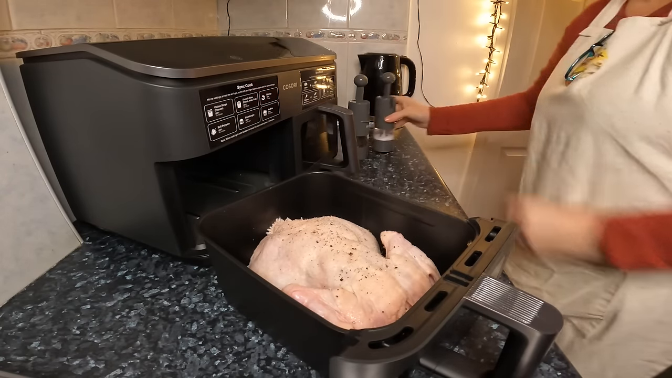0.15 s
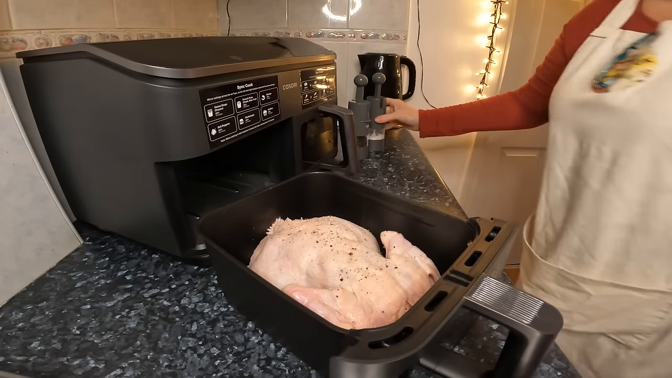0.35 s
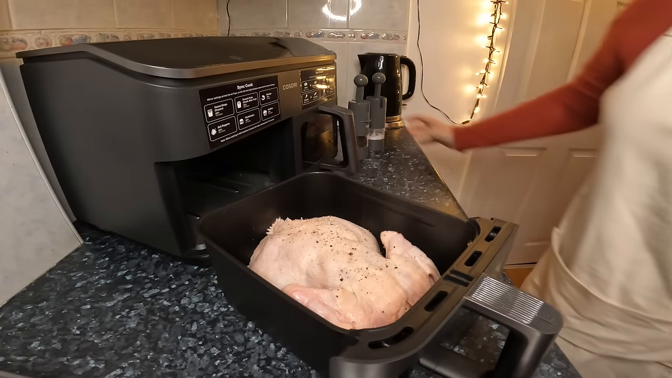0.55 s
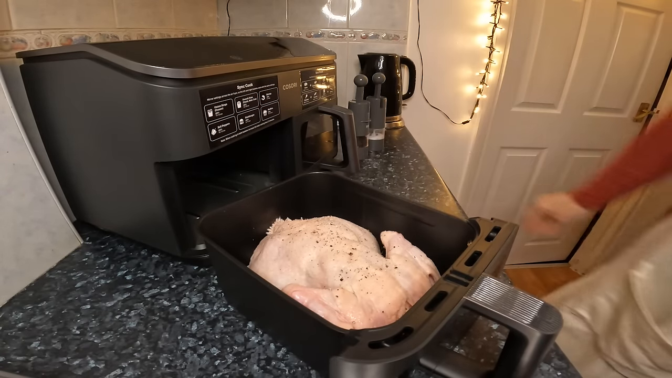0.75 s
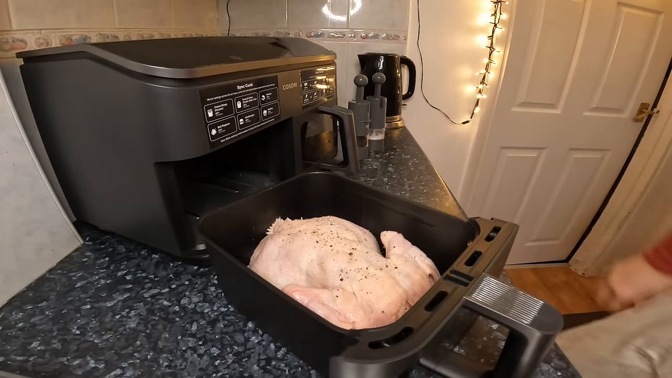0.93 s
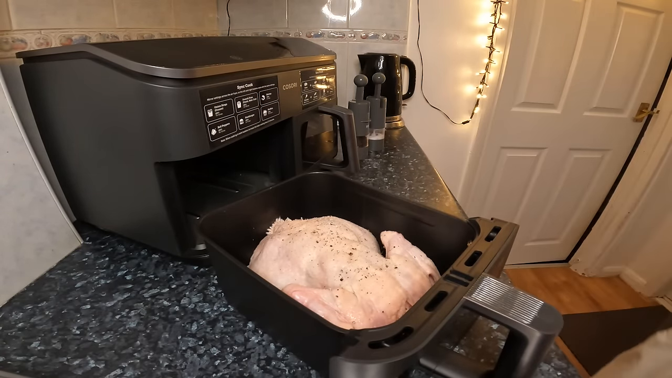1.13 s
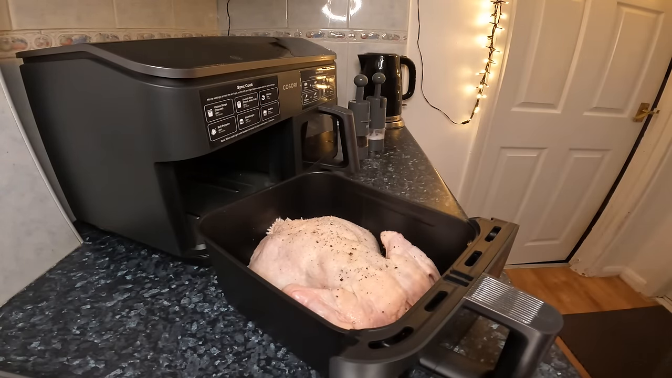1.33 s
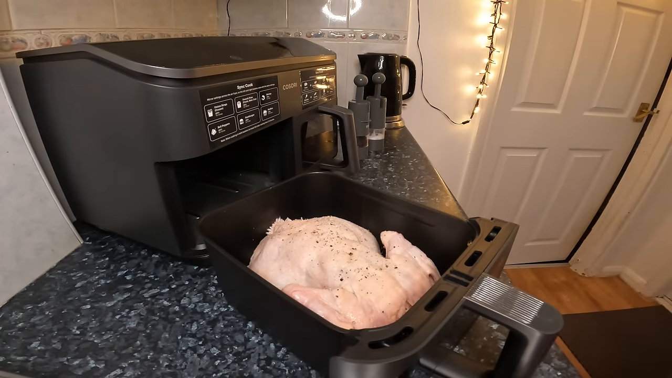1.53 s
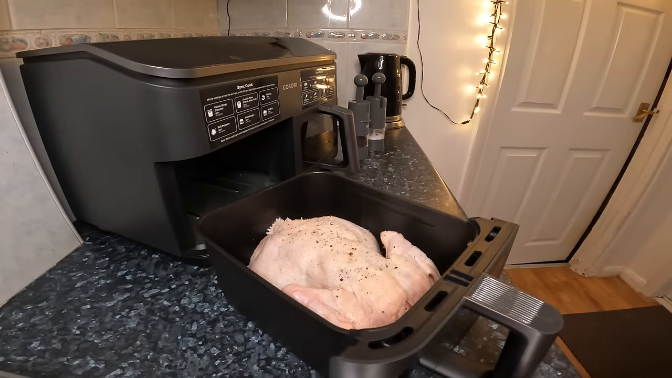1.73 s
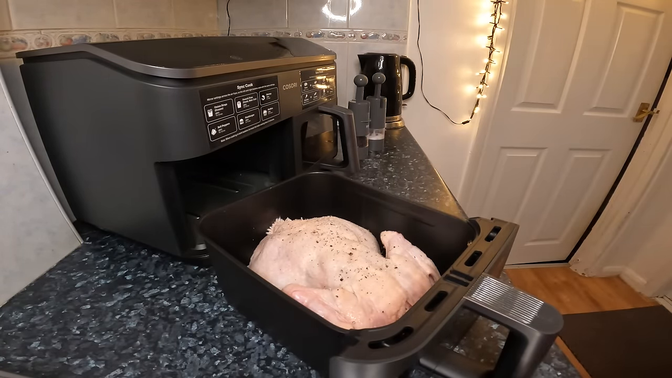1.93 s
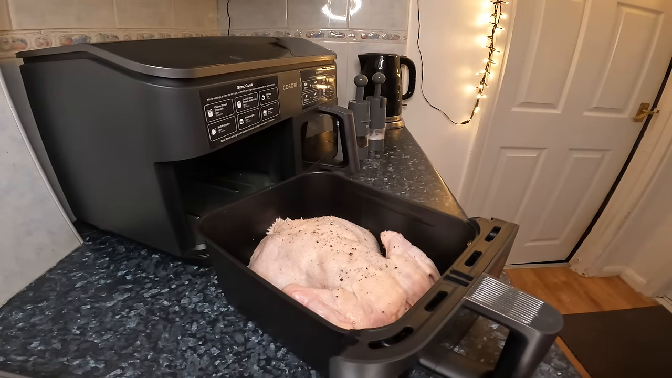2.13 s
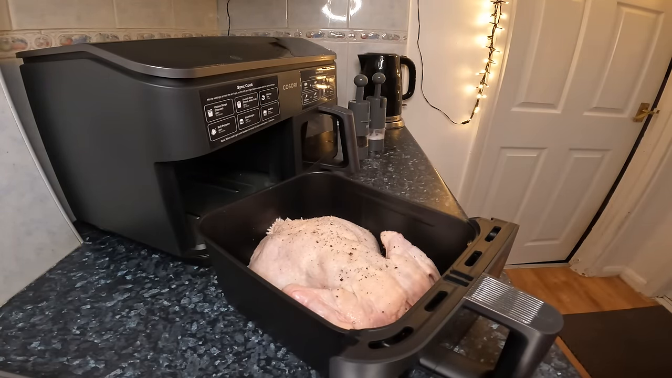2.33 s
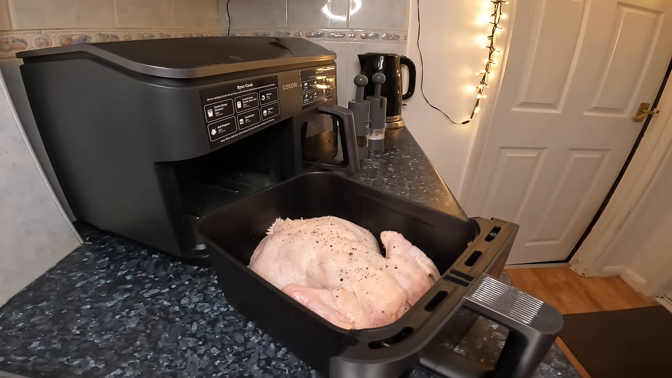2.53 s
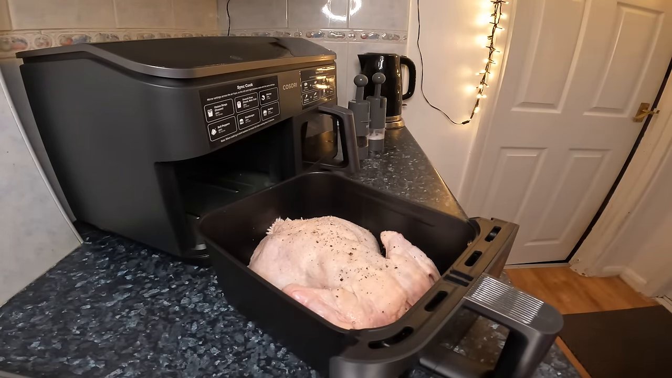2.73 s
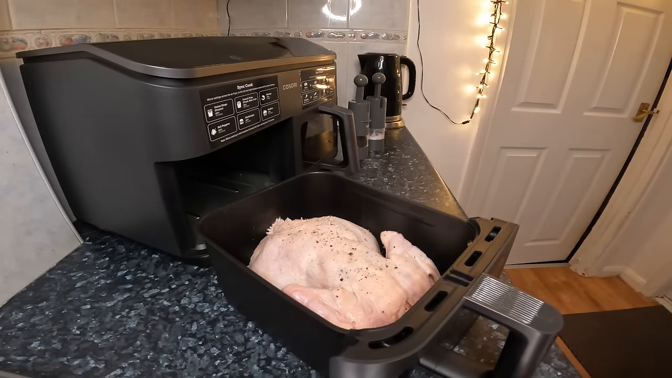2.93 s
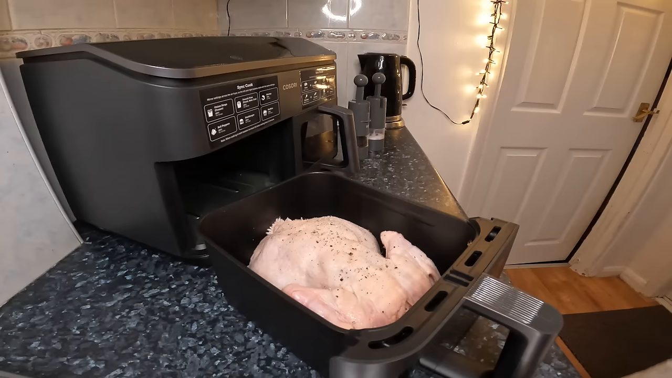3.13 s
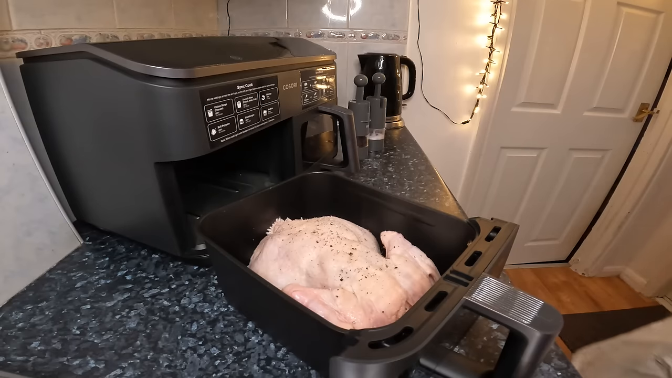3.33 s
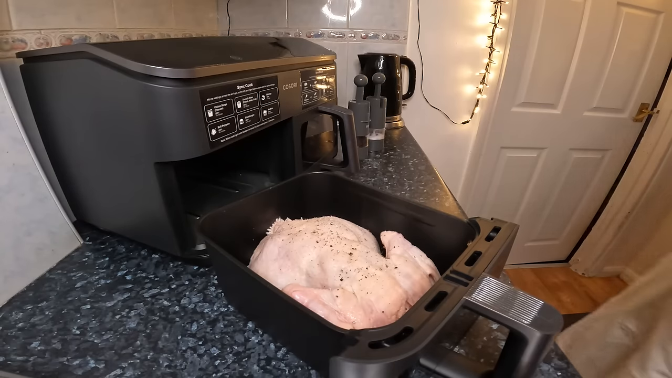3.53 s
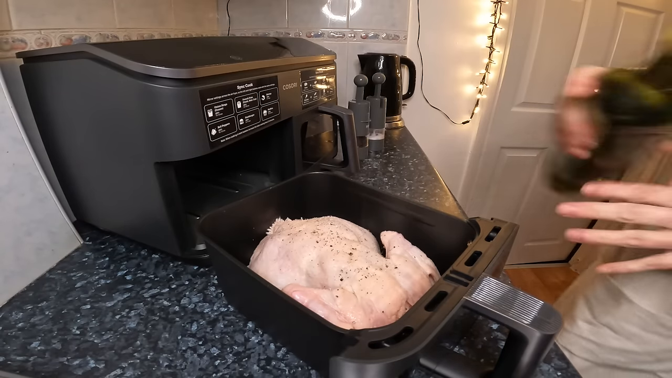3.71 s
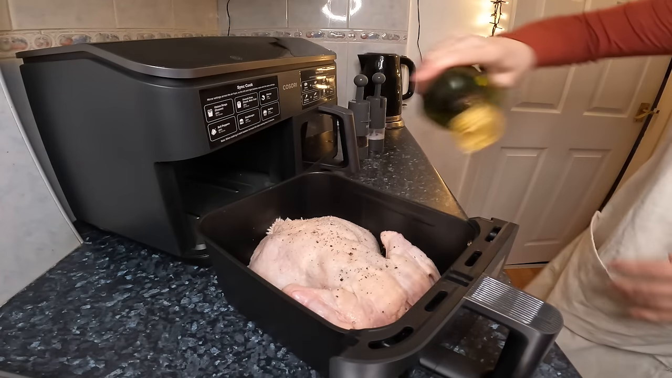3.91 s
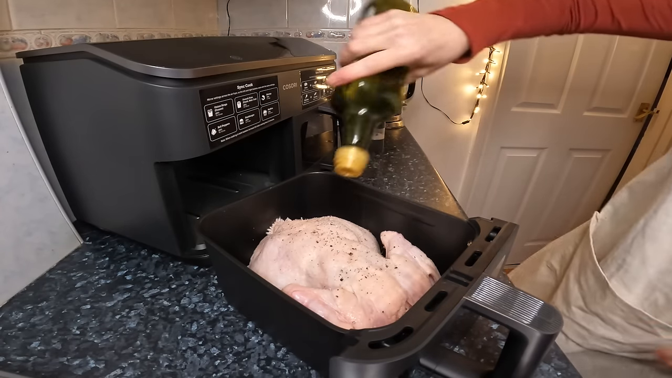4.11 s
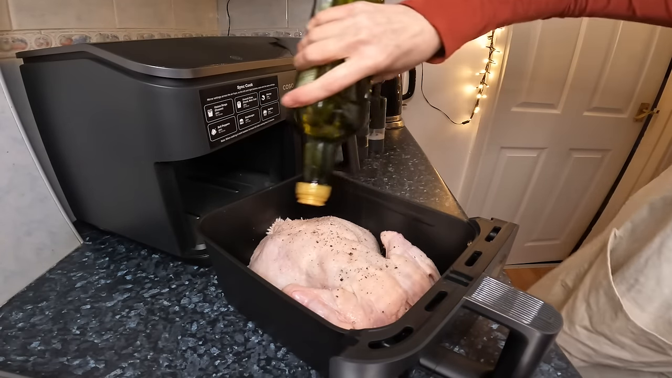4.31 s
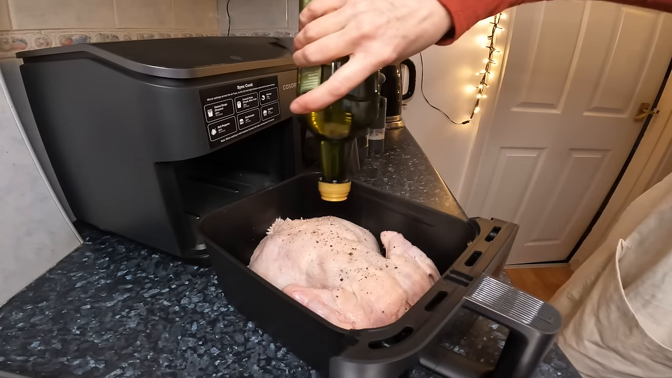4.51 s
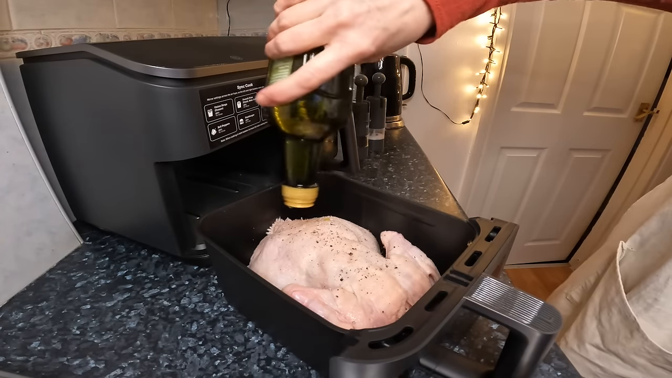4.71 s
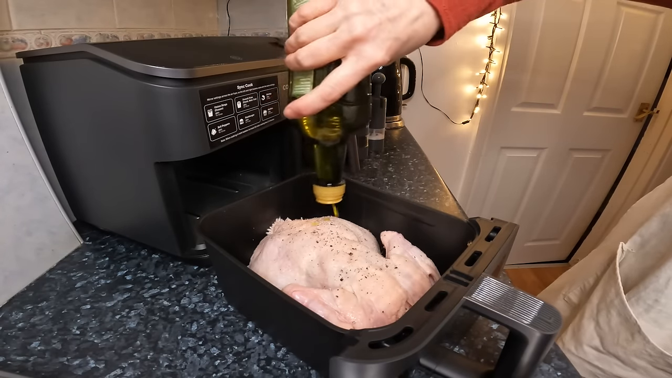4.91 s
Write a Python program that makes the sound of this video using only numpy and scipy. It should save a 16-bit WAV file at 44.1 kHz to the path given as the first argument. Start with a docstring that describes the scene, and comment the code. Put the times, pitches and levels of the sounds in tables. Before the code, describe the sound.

Stereo close pickup on a kitchen counter with short bright reflections. First a woody grinder thump and small settling taps, then a sprung cupboard door popping open, off to the left and more roomy. Dull glass knocks and scraping on a shelf follow, then a double door thud, a slosh near the microphone, and a quick bubbling glug fading into quiet room hush.

```python
"""Grinder, cupboard and oil bottle

A small hard kitchen heard by two microphone ports on the worktop. A seasoning grinder is set down, a cupboard
is pulled open, a glass bottle is dragged and knocked on its shelf, and the door clacks and thuds shut: struck
modes over bursts of noise, with streams of tiny slips for friction. Oil sloshes as the bottle is swung over and
glugs into its neck as rising sine bubbles; shaped noise makes cloth, floor rumble, hush and reflections."""
import sys
import numpy as np
from scipy import signal
from scipy.fft import rfft, irfft, next_fast_len
from scipy.io import wavfile
from scipy.ndimage import uniform_filter1d

SR = 44100
rng = np.random.default_rng(int(sys.argv[2]) if len(sys.argv) > 2 else 0)


def unload_wav(signal):
    """Save mono or channel-first audio to the path in sys.argv[1] as 16-bit WAV at rate SR, clipped to [-1, 1]."""
    wavfile.write(
        sys.argv[1],
        SR,
        np.round(np.clip(np.atleast_2d(signal).T, -1, 1) * 32767).astype(np.int16),
    )


N = 223319
TIME = np.arange(N) / SR
HIT = np.arange(int(.8 * SR)) / SR  # time within one blow, bubble or reflection tail [s]
LEFT_RIGHT = np.array([[1], [-1]])

# Table levels are relative: sounds are scaled to a common energy, then mixed in scene().
# spectrum of a low thump through furniture: (frequency [Hz], density [dB per Hz])
THUMP = [(25, -26.5), (60, -10), (110, 0.5), (200, -2.5), (300, -14.5), (600, -25), (2000, -70)]
# spectrum of a bright click: (frequency [Hz], density [dB per Hz])
CLICK = [(300, -23), (1200, 9), (2200, 5.5), (3000, 0), (5500, 3.5), (7500, -4.5), (10000, -17.5),
         (15000, -32)]
# low modes of the shelf, also used for hand bumps: (frequency [Hz], level [dB], t60 [s])
SHELF_MODES = [(84.2, -31, 0.18), (105.5, 6, 0.18), (155.3, -2, 0.27), (208.6, -8, 0.13)]
# reverberation of the kitchen: (frequency [Hz], t60 [s], density [dB per Hz], side over mid [dB])
KITCHEN = [(57.9, 0.31, -36.5, -19.5), (162, 0.64, -9.5, -7), (416, 0.32, 0, -11.5), (1050, 0.25, 3.5, -7),
           (2000, 0.29, 0, -5.5), (5000, 0.32, -2.5, -10), (14000, 0.24, 1.5, -1.5)]


def undb(db):
    """Decibels to gain."""
    return 10 ** (np.asarray(db) / 20)


def along(points, hz, axis=1):
    """Read a column of a table on a log-frequency axis."""
    table = np.array(points, float)
    return np.interp(np.log(np.maximum(hz, 1)), np.log(table[:, 0]), table[:, axis])


def shape(x, gain):
    """Filter by a gain that is a function of frequency."""
    length = x.shape[-1]
    size = next_fast_len(length)
    hz = np.arange(size // 2 + 1) * SR / size
    return irfft(rfft(x, size) * gain(hz), size)[..., :length]


def noise(spectrum, size):
    """Coloured noise of rms 1."""
    x = shape(rng.standard_normal(size), lambda hz: undb(along(spectrum, hz)))
    return x / x.std()


def fade(t60):
    """Free decay of a vibration, by 60 dB in t60 seconds."""
    return np.exp(-np.log(1000) * HIT / max(t60, 1e-3))


def unit(x):
    """Scale a blow to the energy of 20 ms at full level."""
    return x / np.sqrt(np.sum(x ** 2) / (SR / 50))


def add(track, s, sound):
    """Mix a sound into a track from time s."""
    start = max(int(s * SR), 0)
    track[start:start + len(sound)] += sound[:N - start]


def walk(rate):
    """Smoothed random steps, drawn at the given rate [Hz] and scaled to a spread of 1."""
    k = int(SR / rate)
    steps = np.repeat(rng.standard_normal(N // k + 1), k)
    x = uniform_filter1d(uniform_filter1d(steps, k), k)[:N]
    return x / x.std()


def swell(s, length_s, attack_s, t60):
    """Attack, hold and release of one movement; length_s includes the attack."""
    attack = np.clip((TIME - s) / attack_s, 0, 1)
    return attack * np.exp(-np.log(1000) * np.maximum(TIME - s - length_s, 0) / t60)


def ring_modes(modes):
    """Decaying sines of one struck body, their balance and tuning varied a little at random."""
    ring = np.zeros(len(HIT))
    chance = rng.standard_normal((len(modes), 2))
    for (hz, db, life), (a, b) in zip(modes, chance):
        # slow modes all start with the push; fast ones start either way
        sign = np.sign(b) if hz > 280 else 1
        tone = np.sin(2 * np.pi * hz * (1 + .004 * b) * HIT)
        ring += undb(db + 2 * a) * sign * tone * fade(life)
    return ring


def strike(rows, axis, spectrum, t60, rise_s, modes=(), dense_db=0):
    """Blows on one body: clear modes over a decaying noise burst of dense, unresolved ones."""
    track = np.zeros(N)
    for row in rows:
        sound = undb(dense_db) * unit(noise(spectrum, len(HIT)) * fade(t60))
        if len(modes):
            sound = sound + unit(ring_modes(modes))
        # a large or softly hit body takes a moment to get going
        onset = 1 - np.exp(-HIT / rise_s)
        add(track, row[0], undb(row[axis]) * unit(sound * onset))
    return track


def rub(curve, spectrum, slips_per_s):
    """Friction: a stream of uneven little slips shakes the body."""
    slips = (rng.random(N) < slips_per_s / SR) * rng.standard_normal(N)
    x = shape(slips, lambda hz: undb(along(spectrum, hz)))
    level_db = np.interp(TIME, *np.transpose(curve), left=-np.inf, right=-np.inf)
    return x / x.std() * undb(level_db)


def rebounds(rows, gap_s, stretch, touch_db, count):
    """A loose part touches, then strikes again: gaps grow by stretch, blows weaken by the row's loss."""
    delays = gap_s * np.cumsum([0, *stretch ** np.arange(count - 1)])
    blows = []
    for s, *levels, loss_db in rows:
        for k, delay in enumerate(delays):
            first_db = touch_db if k == 0 else 0
            blows.append((s + delay, *(np.array(levels) - k * loss_db + first_db)))
    return blows


def diffuse(mid, side):
    """Sound arriving from all round: mid shared by both ports, side opposed, by frequency."""
    # balance of the ports: (frequency [Hz], left minus right [dB])
    balance = [(200, -1), (500, -0.2), (1200, 0.5), (2400, 2), (4500, -0.2), (8000, 2), (14000, 10.5)]
    pair = mid + LEFT_RIGHT * shape(side, lambda hz: undb(along(KITCHEN, hz, axis=3)))
    return shape(pair, lambda hz: undb(LEFT_RIGHT * along(balance, hz) / 2))


def kitchen(x, build_s):
    """Reflections from tiles and doors thicken, then die away band by band."""
    tail = 0
    for row, weight in zip(KITCHEN, np.eye(len(KITCHEN))):
        # overlapping bands, each peaking at its own row's frequency
        band = [(r[0], w) for r, w in zip(KITCHEN, weight)]
        grains = shape(rng.standard_normal((2, len(HIT))), lambda hz: np.sqrt(along(band, hz)))
        tail = tail + undb(row[2]) * fade(row[1]) * grains
    response = diffuse(*tail) * (1 - np.exp(-HIT / build_s))
    response = response / np.sqrt(np.sum(response ** 2) / 2)
    return signal.fftconvolve(x[None], response, axes=1)[:, :N]


def background():
    """The still room as diffuse noise, and a steady floor rumble that swells under each step."""
    # spectrum of the floor: (frequency [Hz], density [dB per Hz])
    deep = [(20, -6.0), (45, 9.5), (110, -4.0), (190, -7.0), (300, -26.0), (800, -40), (3000, -80.0)]
    # deep, soft thuds as weight shifts on the floor: (time [s], level [dB])
    footfalls = [(.54, -43), (1.12, -42), (1.2, -41.5), (1.481, -32), (1.87, -45.5), (2.7, -57),
                 (3.23, -44.5), (3.42, -33.5), (3.6, -38), (4.87, -56)]
    # spectrum of the still room: (frequency [Hz], density [dB per Hz])
    hush = [(20, 3), (45, -22), (110, -21), (210, -21.5), (330, -31.5), (1500, -41), (3500, -50),
            (7300, -43.5), (15500, -71)]
    attack_s, t60_s = 0.029, 0.73
    floor_db, hush_db = -60, -53.5
    steps = sum(undb(db) * swell(s, attack_s, attack_s, t60_s) for s, db in footfalls)
    floor = noise(deep, N) + undb(-11.5) * LEFT_RIGHT * noise(deep, N)
    rumble = np.hypot(steps, undb(floor_db)) * floor
    return rumble + undb(hush_db) * diffuse(noise(hush, N), noise(hush, N))


def clothes(grain_db):
    """Cloth slides on cloth with each movement: a hiss made uneven by the catching weave."""
    # swishes of the cook's sleeve or apron: (time [s], length [s], level [dB])
    moves = [(-.06, 0.41, -58.5), (0.351, 0.13, -46), (0.838, 0.12, -51.5), (1.032, .18, -62.5),
             (1.32, 0.49, -61), (2.1, 0.44, -60.5), (2.44, 0.15, -46), (2.807, 0.31, -58),
             (3.58, 0.34, -57.5), (4.003, 0.13, -59), (4.275, 0.16, -77)]
    # spectrum of the cloth hiss: (frequency [Hz], density [dB per Hz])
    cloth = [(100, -5), (300, -5.5), (700, -9), (1200, 2), (2000, -1.5), (5000, -3.5), (7300, -7),
             (10500, -22.5), (12500, -20.5), (15500, -44)]
    attack_s, t60_s = 0.043, 0.38
    hiss_db, hiss_end_s = -68, 4.5  # a faint steady hiss under the swishes, fading out after 4.5 s
    swishes = [undb(db) * swell(s, length, attack_s, t60_s) for s, length, db in moves]
    hiss = undb(hiss_db) * swell(0, hiss_end_s, attack_s, t60_s)
    level = np.linalg.norm([*swishes, hiss], axis=0) * undb(grain_db * walk(90))
    return level * diffuse(noise(cloth, N), noise(cloth, N))


def handling():
    """Small bumps and sharp ticks of fingers and cap on the hand-held glass."""
    # touches on the glass: (time [s], dull bump [dB], tick [dB])
    ticks = [(.0425, -70.5, -43.5), (.087, -76, -56), (3.6085, -25, -41), (3.636, -36.5, -49),
             (3.683, -43, -41), (3.766, -40, -46.5), (3.8645, -31, -43.5), (4.2578, -28.5, -31.5),
             (4.279, -40, -63), (4.3803, -72.5, -50.5), (4.409, -44, -43.5), (4.455, -66, -49.5),
             (4.559, -70, -59.5)]
    bump = strike(ticks, axis=1, spectrum=THUMP, t60=0.1, rise_s=0.016, modes=SHELF_MODES, dense_db=-6.5)
    return bump + strike(ticks, axis=2, spectrum=CLICK, t60=0.023, rise_s=0.00012)


def grinder():
    """The grinder's base lands, rocks and settles with its filling rattling; the worktop thumps under it."""
    # contacts with the worktop: (time [s], worktop thump [dB], grinder body [dB], click [dB])
    landings = [(.3383, -53, -22.5, -83), (.3405, -14.5, -28, -33.5), (.354, -43, -35, -67),
                (.4135, -27.5, -73, -37), (.4665, -26.5, -39, -44.5)]
    # a light clink as the hand lets go: (time [s], level [dB])
    release = [(.5955, -49)]
    # rattling of the filling: (time [s], level [dB])
    filling = [(.35, -58), (.42, -43.5), (.5, -47.5), (.56, -57)]
    # modes of worktop, grinder and clink: (frequency [Hz], level [dB], t60 [s])
    worktop_modes = [(77.8, -20.5, 0.27), (114.3, -2, 0.26), (175.5, -5, 0.22), (198, 7.5, 0.087),
                     (249.3, -7.5, 0.19)]
    grinder_modes = [(379, -7.5, 0.099), (660, -16, 0.11), (760, 8, 0.033), (880, -15.5, 0.1),
                     (953, 2, 0.062), (1107, 14, 0.024), (1320, -4.5, 0.053), (1600, -11.5, .15),
                     (4000, -24.5, 0.38)]
    clink_modes = [(1270, -3, 0.074), (2640, -3.5, .03)]
    # dense vibration of the grinder: (frequency [Hz], density [dB per Hz])
    body_spectrum = [(100, -21), (300, 4), (480, 4), (750, 10), (1300, 3), (2000, -17), (5000, -36),
                     (12000, -54)]
    thump = strike(landings, axis=1, spectrum=THUMP, t60=0.31, rise_s=0.0021,
                   modes=worktop_modes, dense_db=-7)
    body = strike(landings, axis=2, spectrum=body_spectrum, t60=.03, rise_s=0.000335,
                  modes=grinder_modes, dense_db=12.0)
    click = strike(landings, axis=3, spectrum=CLICK, t60=0.071, rise_s=0.00024)
    clink = strike(release, axis=1, spectrum=CLICK, t60=0.03, rise_s=.0005,
                   modes=clink_modes, dense_db=-7.5)
    return thump + body + click + clink + rub(filling, body_spectrum, slips_per_s=640)


def cupboard():
    """The sprung catch snaps over and chatters; the panel booms, and jolts the whole unit at the frame."""
    # blows on the door: (time [s], panel boom [dB], woody rattle [dB], loss per rebound [dB])
    door_blows = [(1.371, -21, -50, 5), (1.4615, -13, -30.5, 6), (1.566, -29, -67.5, 8.5),
                  (1.648, -30, -61, 21.5), (1.765, -50.5, -56, 1.5), (3.147, -47, -55, 8.5),
                  (3.279, -55.5, -35, 11), (3.3135, -13.5, -27.5, 3.5), (3.354, -14, -41, 0.5)]
    # snaps of the sprung catch: (time [s], ring [dB], metal click [dB], loss per rebound [dB])
    catch_snaps = [(1.4562, -16, -26, 5), (3.1442, -27.5, -25, 5.5), (3.3165, -41, -37, 5)]
    # door meeting its frame: (time [s], level [dB])
    frame_hits = [(3.3145, -28.5), (3.338, -20.5), (3.362, -21.5)]
    # the door's drag, then its dry hinge: (time [s], level [dB])
    door_drag = [(1.3, -64), (1.38, -43), (1.45, -67)]
    hinge = [(3.17, -43), (3.21, -43), (3.3, -92)]
    # modes of panel, frame and catch: (frequency [Hz], level [dB], t60 [s])
    panel_modes = [(39.3, -12, 0.95), (49.1, -9, 0.34), (69.5, -12, 0.3), (100.3, -3.5, 0.19),
                   (112.6, 1.5, 0.24), (158.2, -7, 0.32), (213.3, -24.5, 0.095)]
    frame_modes = [(164.2, -1.5, 0.28), (183.7, -2, 0.22), (212, -0.63, 0.15)]
    catch_modes = [(900, -7.5, 0.34), (1000, -17.5, .18), (1195, -0.5, .2), (1410, -5, 0.2),
                   (1537, 5, 0.24), (1740, -5, 0.12), (1720, 8, 0.13), (1936, 3, 0.24), (2030, -10, 0.26),
                   (2080, -15.5, .22), (2300, -7, 0.29)]
    # dense vibration of panel, wood, catch and spring: (frequency [Hz], density [dB per Hz])
    panel_spectrum = [(20, -8), (45, -14), (70, 2.5), (120, 0.5), (180, -13), (280, -23), (600, -32),
                      (2000, -83.5)]
    wood_spectrum = [(150, 2.5), (300, -0.5), (450, -1), (650, -10), (920, -4.5), (1300, -5.5),
                     (1800, -6.5), (3500, -15), (6000, -22.5), (9000, -48), (15000, -52.5)]
    catch_spectrum = [(300, -40), (650, -47), (900, -13.5), (1300, -2.5), (1700, 7.5), (2100, 3),
                      (2700, -20.5), (4500, -12), (7500, -14.5), (10500, -29.5), (15500, -39.5)]
    spring_spectrum = [(500, -25), (1200, -11), (1800, 1), (2700, -0.5), (3700, -3), (4600, -8),
                       (6000, -18.5), (7700, -17.5), (11000, -31.5), (15000, -41)]
    blows = rebounds(door_blows, gap_s=.0175, stretch=1, touch_db=-0.5, count=2)
    snaps = rebounds(catch_snaps, gap_s=.011, stretch=1.6, touch_db=-5.5, count=5)
    boom = strike(blows, axis=1, spectrum=panel_spectrum, t60=0.3, rise_s=0.004,
                  modes=panel_modes, dense_db=-3)
    jolt = strike(frame_hits, axis=1, spectrum=THUMP, t60=0.12, rise_s=0.0015,
                  modes=frame_modes, dense_db=-10.0)
    rattle = strike(blows, axis=2, spectrum=wood_spectrum, t60=0.14, rise_s=0.0019)
    catch = strike(snaps, axis=1, spectrum=catch_spectrum, t60=0.082, rise_s=0.00042,
                   modes=catch_modes, dense_db=10.5)
    click = strike(snaps, axis=2, spectrum=spring_spectrum, t60=0.13, rise_s=0.000547)
    friction = rub(door_drag, wood_spectrum, slips_per_s=3500)
    friction = friction + rub(hinge, spring_spectrum, slips_per_s=2000)
    return boom + jolt, rattle + catch + click + friction


def shelf():
    """The bottle's heel judders over the shelf and bumps it on the way out."""
    # bottle knocking on the shelf: (time [s], shelf boom [dB], bottle clunk [dB], scrape [dB])
    bumps = [(2.131, -42, -36.5, -61), (2.194, -41, -36.5, -69), (2.2855, -33.5, -45, -42.5),
             (2.315, -39.5, -67, -43), (2.37, -37, -44.5, -79), (2.454, -31, -27, -42),
             (2.4635, -49, -21.5, -59), (2.481, -48, -33.5, -34.5), (2.50, -24.5, -33, -54),
             (2.5185, -23, -29.5, -42), (2.543, -18.5, -58, -55), (2.819, -68.5, -52, -47.5)]
    # the bottle's low judder, then its scuff: (time [s], level [dB])
    judder = [(2.07, -68), (2.14, -42.5), (2.21, -40), (2.27, -66.5), (2.42, -57)]
    scuff = [(2.07, -64), (2.2, -48), (2.268, -79), (2.285, -40.5), (2.4, -68)]
    # modes of the bottle: (frequency [Hz], level [dB], t60 [s])
    bottle_modes = [(299.5, -6.5, 0.4), (359, -7, 0.26), (451.3, 6.5, 0.18), (507, -0.5, 0.29),
                    (710, -20.5, 0.21), (953, -7, 0.25), (1090, 1, 0.16), (1300, -21.5, 0.33)]
    # dense vibration of clunk and scrape: (frequency [Hz], density [dB per Hz])
    clunk_spectrum = [(150, -59), (280, -14.5), (380, 2), (500, -2.5), (700, -15.5), (1000, -27),
                      (1500, -22.5), (2500, -26), (8000, -54.5), (15000, -69)]
    scrape_spectrum = [(300, -19), (700, -1.5), (1100, 9.5), (1600, -3.5), (3000, -17), (7000, -20.5),
                       (10000, -33.5), (15000, -51.5)]
    boom = strike(bumps, axis=1, spectrum=THUMP, t60=0.28, rise_s=0.0081,
                  modes=SHELF_MODES, dense_db=-13.5)
    clunk = strike(bumps, axis=2, spectrum=clunk_spectrum, t60=0.091, rise_s=0.0018,
                   modes=bottle_modes, dense_db=8)
    scrape = strike(bumps, axis=3, spectrum=scrape_spectrum, t60=0.24, rise_s=0.00075)
    friction = rub(judder, clunk_spectrum, slips_per_s=780)
    friction = friction + rub(scuff, scrape_spectrum, slips_per_s=3000)
    return boom, clunk + scrape + friction


def oil(glide):
    """Each air bubble rings and rises in pitch by the fraction glide as it nears the surface."""
    # larger bubbles: (time [s], starting pitch [Hz], level [dB], t60 [s])
    large = [(3.553, 381, -25, 0.045), (3.5535, 510, -27.5, 0.019), (3.554, 228, -28, 0.039),
             (3.555, 930, -43, 0.026), (3.613, 417, -27, 0.062), (3.6145, 563, -30.5, 0.045),
             (3.678, 370, -39, 0.021), (3.768, 483, -41.5, 0.0082), (4.259, 207, -27, 0.24),
             (4.283, 1745, -36, 0.051), (4.302, 558, -26, 0.19), (4.303, 284, -29, 0.19),
             (4.329, 483, -34, 0.044), (4.329, 8150, -54, 0.023), (4.3815, 958, -40, 0.056),
             (4.381, 7680, -49, .04), (4.388, 468, -33.5, 0.024), (4.399, 2300, -48, 0.019),
             (4.408, 3320, -49, 0.038), (4.4205, 1212, -34, 0.031), (4.453, 2240, -36.5, 0.053),
             (4.562, 2510, -62.5, .04)]
    track = np.zeros(N)
    for s, hz, db, t60 in [*large, *froth(count=56, spread_db=19.5)]:
        pitch = hz * (1 + glide * np.minimum(HIT / t60, 1))
        tone = np.sin(2 * np.pi * np.cumsum(pitch) / SR)
        onset = 1 - np.exp(-HIT / (0.0075 * t60))
        add(track, s, undb(db) * unit(tone * fade(t60) * onset))
    return track


def froth(count, spread_db):
    """Lesser bubbles of the glug: large ones first, smaller and fainter as the air breaks up."""
    # course of the lesser bubbles: (time [s], middle pitch [Hz], middle level [dB])
    course = [(4.266, 290, -34), (4.36, 500, -51.5), (4.419, 2060, -64), (4.509, 3490, -61)]
    when, size, strength = rng.random((count, 3)).T
    place = np.linspace(0, 1, len(course))
    s, hz, db = (np.interp(when, place, column) for column in np.transpose(course))
    hz = hz * 2 ** (2 * size - 1)  # sizes scatter an octave either way
    t60 = 16 / hz
    return np.transpose([s, hz, db + spread_db * (strength - .5), t60])


def scene():
    """Near things are heard directly; the cupboard mostly by way of the walls, its boom through the units."""
    set_down = grinder()
    bottle = oil(glide=0.1) + handling()
    door_boom, door = cupboard()
    shelf_boom, knocks = shelf()
    direct = undb(-4.0) * set_down + undb(-5.0) * bottle + undb(-1.0) * (door_boom + shelf_boom)
    # door and knocks stand to the left
    direct = direct + undb(-3.0 + LEFT_RIGHT * 1.8) * (door + knocks)
    # each place in the room has its own pattern of reflections
    walls = kitchen(undb(-6.0) * set_down, build_s=0.0059)
    walls = walls + kitchen(undb(-5) * bottle, build_s=0.00245)
    walls = walls + kitchen(undb(-5.5) * door_boom + door, build_s=0.0039)
    walls = walls + kitchen(undb(-8) * shelf_boom + undb(-3.0) * knocks, build_s=0.002)
    return direct + walls + clothes(grain_db=0.92) + background()


def record(dry):
    """Two microphone ports, the right one slightly ahead, and a steep top cut."""
    # phase between the ports: (frequency [Hz], lag of left behind right [rad])
    port_phase = [(400, .02), (1000, 0.17), (2000, 0.64), (5000, 0.76), (10000, .1)]
    top_hz = 15750
    ports = shape(dry, lambda hz: np.exp(-.5j * LEFT_RIGHT * along(port_phase, hz)))
    top_cut = signal.ellip(10, .2, 80, top_hz, fs=SR, output="sos")
    return signal.sosfilt(top_cut, ports)


dry = scene()
out = record(dry)
unload_wav(out)
```